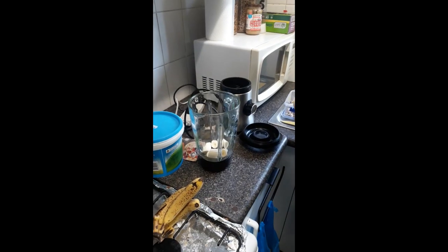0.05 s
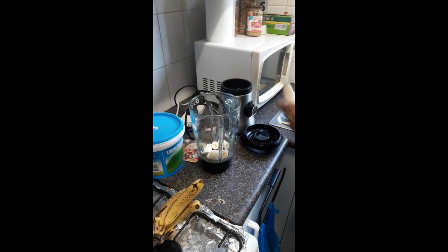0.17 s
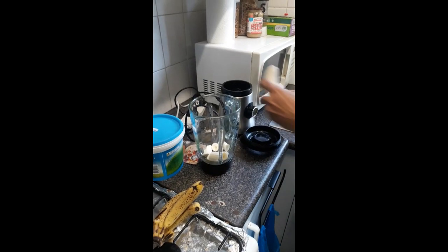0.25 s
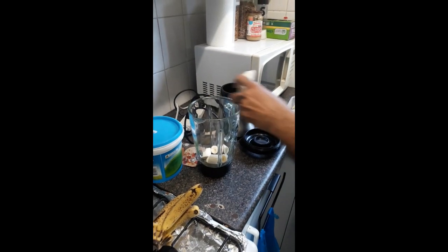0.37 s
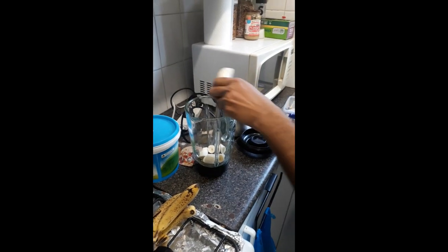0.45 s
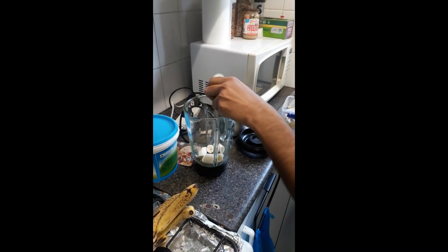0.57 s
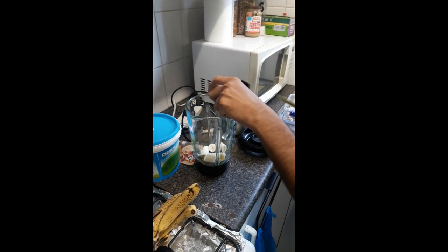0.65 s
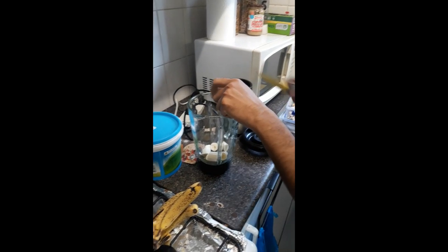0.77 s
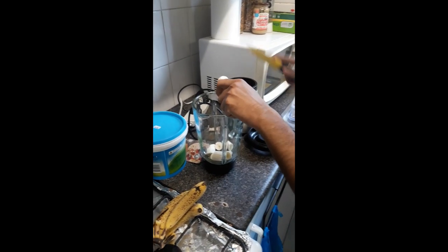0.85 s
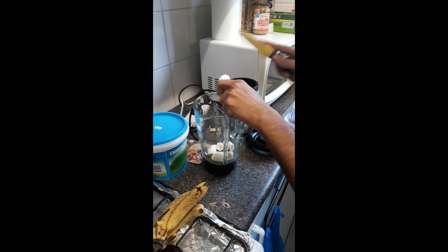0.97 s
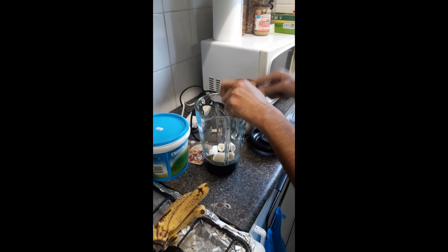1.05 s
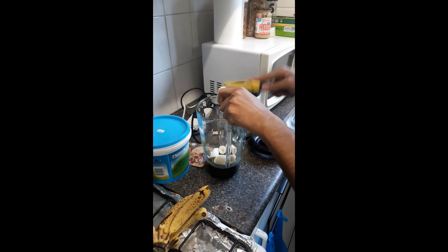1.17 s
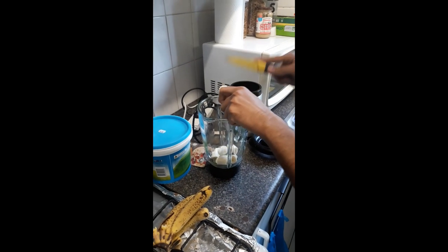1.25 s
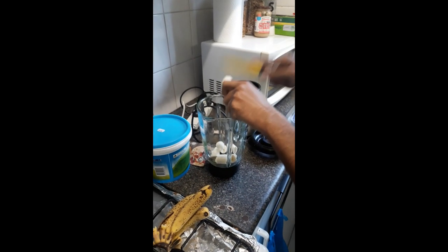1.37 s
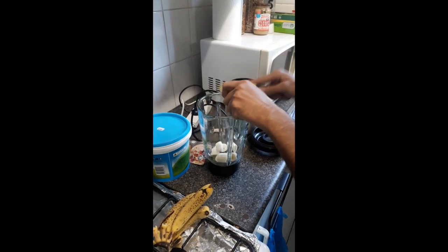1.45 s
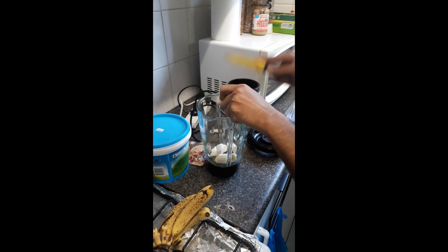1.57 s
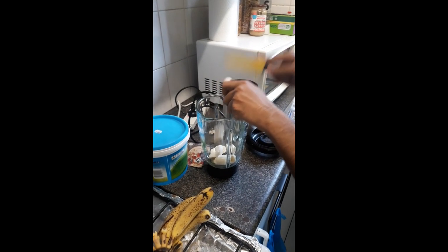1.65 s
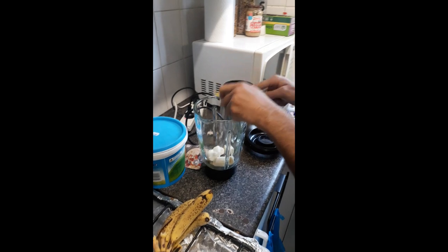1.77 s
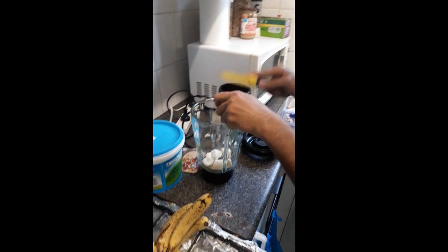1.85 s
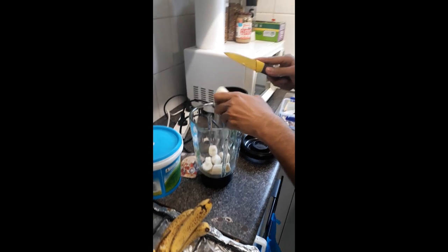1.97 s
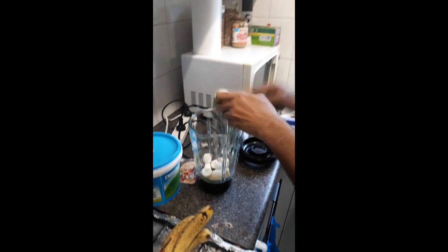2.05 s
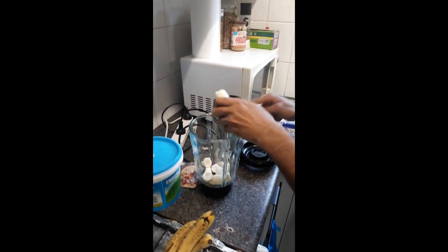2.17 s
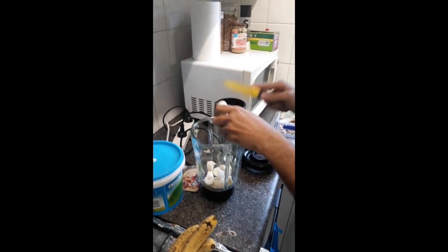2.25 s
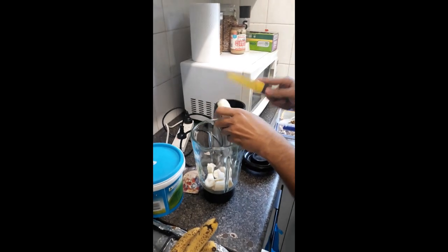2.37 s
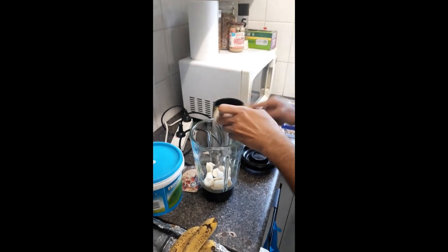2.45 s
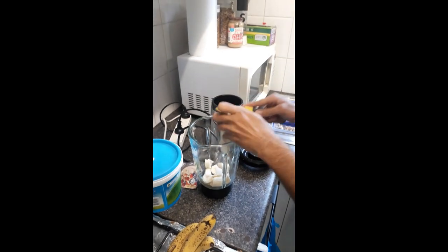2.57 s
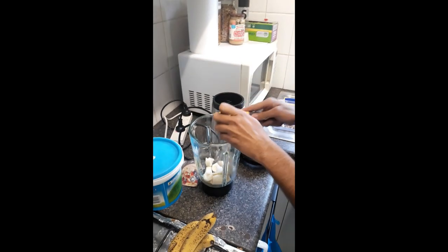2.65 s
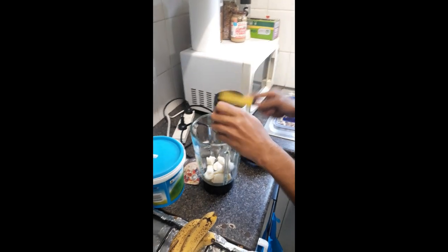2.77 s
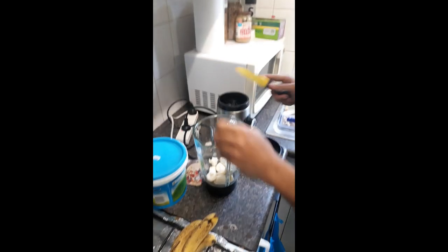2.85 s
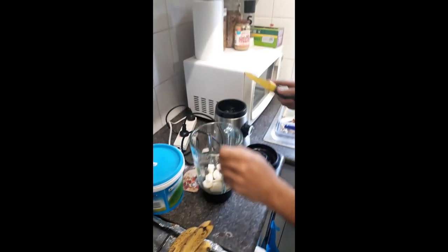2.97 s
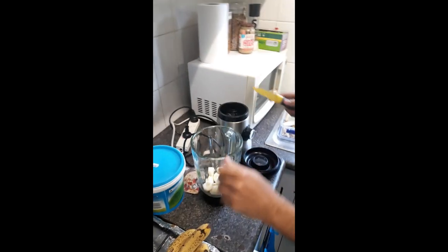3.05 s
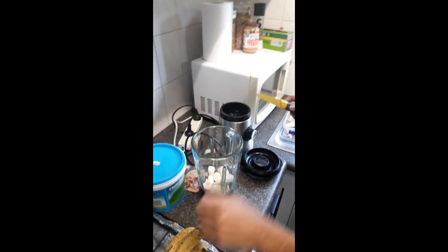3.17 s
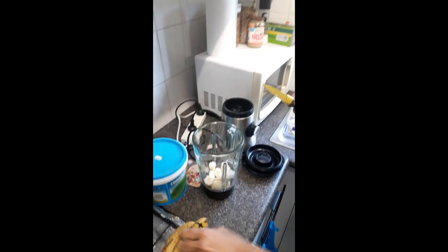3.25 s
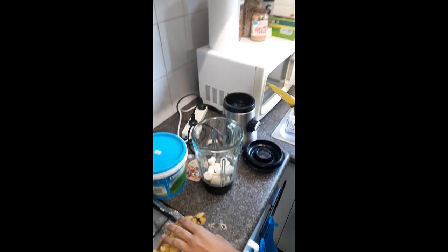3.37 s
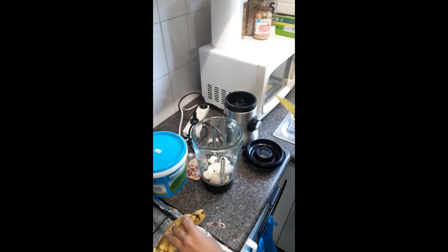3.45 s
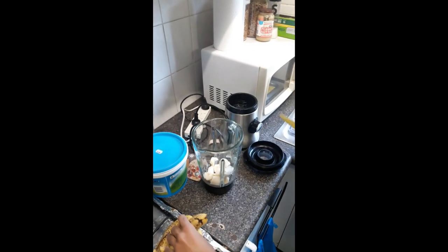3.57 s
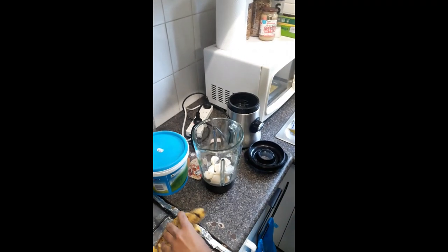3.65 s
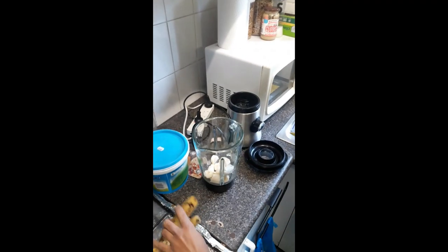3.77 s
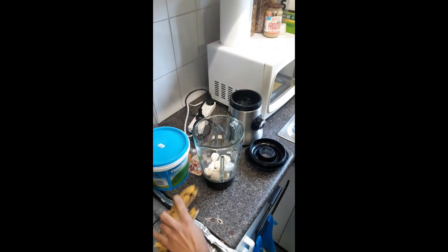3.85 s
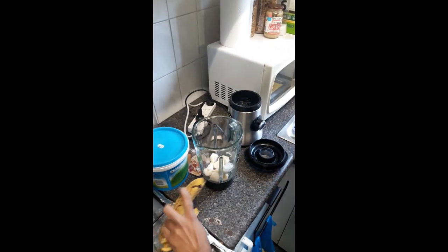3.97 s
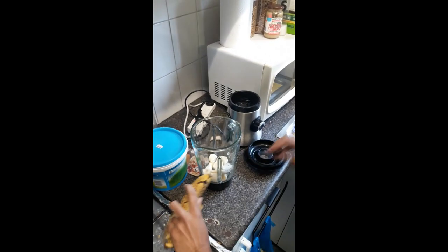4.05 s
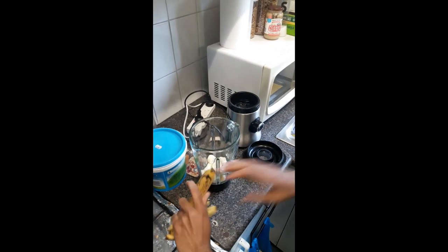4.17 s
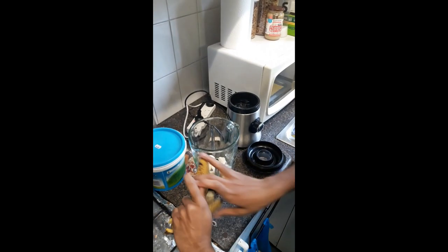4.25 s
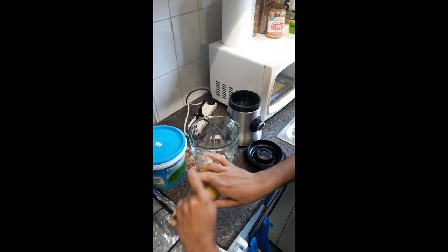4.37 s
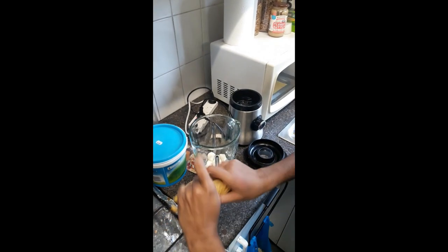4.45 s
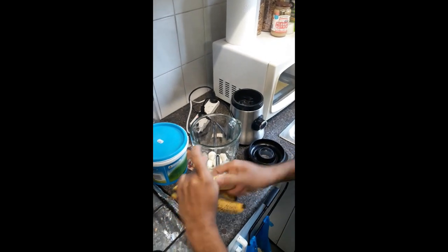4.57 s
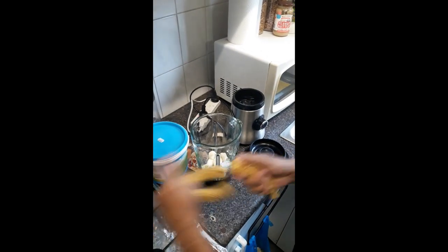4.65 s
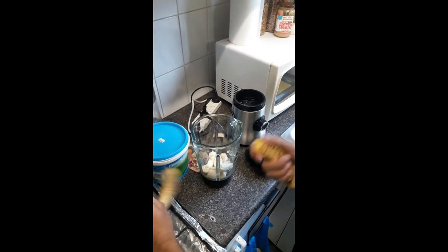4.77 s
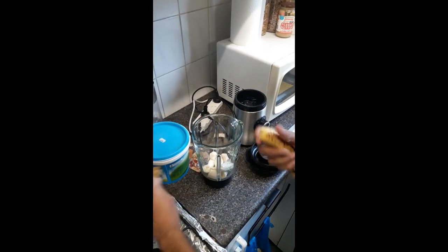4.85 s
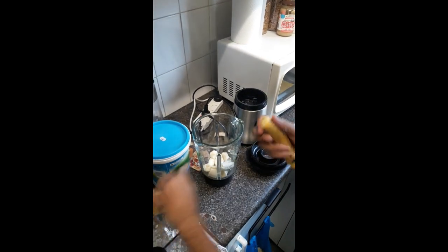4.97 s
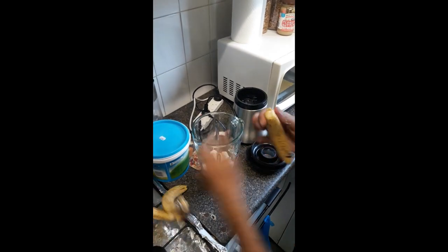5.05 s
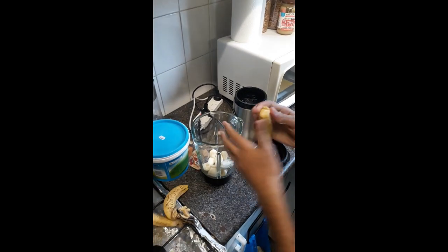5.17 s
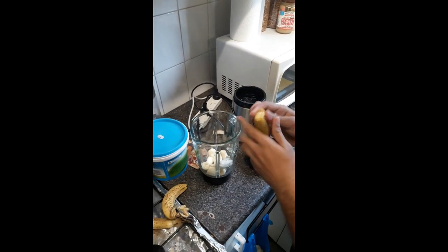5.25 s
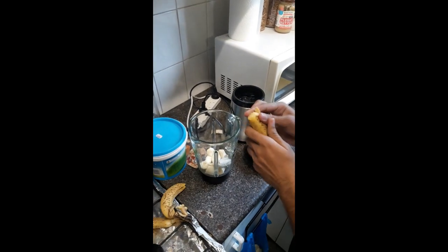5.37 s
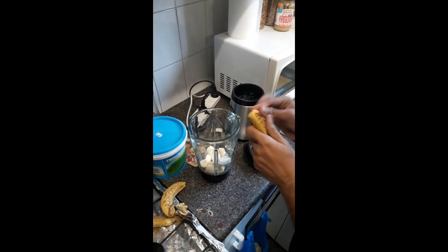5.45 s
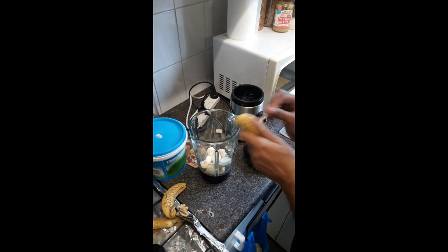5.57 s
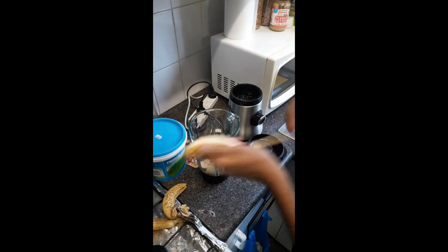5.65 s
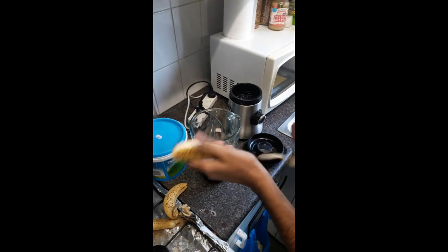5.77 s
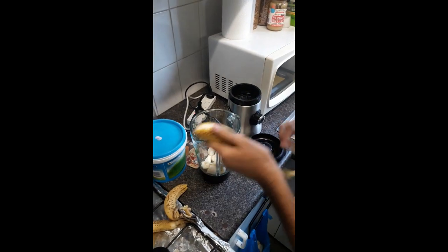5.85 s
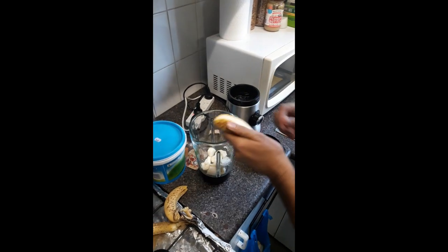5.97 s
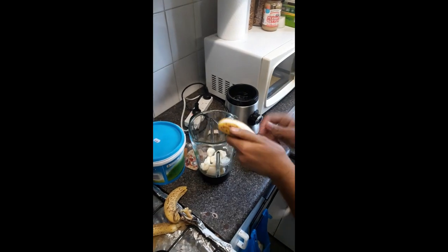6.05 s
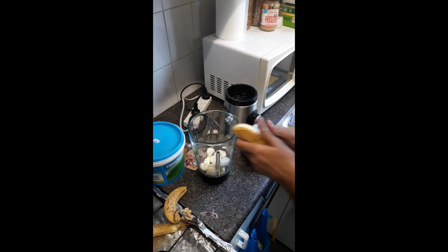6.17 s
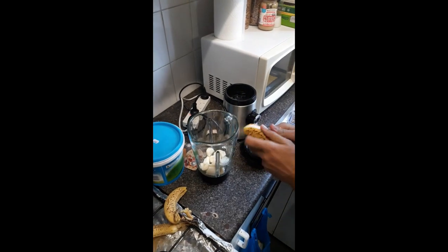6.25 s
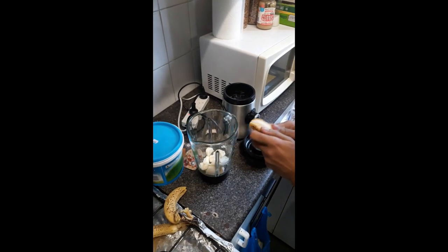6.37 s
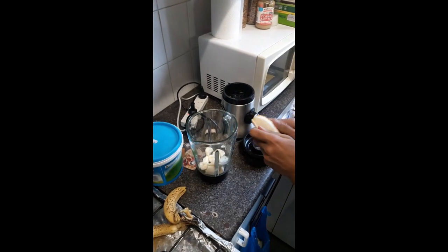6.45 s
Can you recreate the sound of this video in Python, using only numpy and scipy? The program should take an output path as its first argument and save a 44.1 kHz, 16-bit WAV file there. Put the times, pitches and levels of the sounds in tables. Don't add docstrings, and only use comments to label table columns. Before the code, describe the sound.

Quiet food preparation with faint thuds and rubbing, foil crackle, two sudden loud metallic clatters on a counter, then a small dry snap.

```python
import sys
import numpy as np
from scipy import signal
from scipy.fft import rfft, irfft
from scipy.io import wavfile
from scipy.ndimage import uniform_filter1d

SR = 44100
rng = np.random.default_rng(int(sys.argv[2]) if len(sys.argv) > 2 else 0)


def inscribe(sig):
    pcm = np.round(np.clip(np.atleast_2d(sig).T, -1, 1) * 32767)
    wavfile.write(sys.argv[1], SR, pcm.astype(np.int16))


def ratio_of_db(decibels):
    return 10 ** (np.asarray(decibels, float) / 20)


N = 286986
RING_T = np.arange(SR // 2) / SR
DIRECT_DB = 29.5


def unit(x):
    return x / np.sqrt(np.mean(x ** 2))


def band(x, lo_hz, hi_hz):
    return signal.sosfilt(signal.butter(2, [lo_hz, hi_hz], "band", fs=SR, output="sos"), x)


def colour(x, points):
    hz, db = np.transpose(points)
    bins_hz = np.arange(2049) * SR / 4096
    log_gain = np.interp(np.log(bins_hz + 1), np.log(hz), db) * np.log(10) / 20
    cepstrum = irfft(log_gain)
    cepstrum[1:2048] *= 2
    cepstrum[2049:] = 0
    return signal.fftconvolve(x, irfft(np.exp(rfft(cepstrum))))[:len(x)]


def wander(rows, length, hold, smooth):
    steps = np.repeat(rng.standard_normal((rows, length // hold + 1)), hold, axis=1)
    return uniform_filter1d(steps, size=smooth)[:, :length]


def add(out, start_s, x):
    i = int(max(start_s, 0) * SR)
    out[i:i + len(x)] += x[:len(out) - i]


def onset(rise_s):
    return 1 - np.exp(-RING_T / rise_s)


def ring(modes, scatter_db=3, detune=.01):
    hz, db, t60 = np.transpose(modes)[:, :, None]
    t60 = np.minimum(t60, .27)
    chance = rng.standard_normal((2, len(modes), 1))
    wave = np.sin(2 * np.pi * hz * (1 + detune * chance[0]) * RING_T)
    wave = wave * np.exp(-np.log(1000) * RING_T / t60)
    return np.sum(ratio_of_db(db + scatter_db * chance[1]) * wave, axis=0)


def spray(ms, onset_ms, crack=0.5):
    chance, t = rng.standard_normal((2, 3000)), np.arange(1, 3001) / SR
    decay = np.exp(-1000 * t / max(ms, .2)) + crack * np.exp(-t / 0.00091)
    x = chance[0] * ratio_of_db(8.07 * chance[1]) * decay
    x = x * (1 - np.exp(-1000 * t / max(onset_ms, .02)))
    return x / np.sqrt(np.sum(x ** 2))


# low_hz, high_hz
LANES_HZ = [(3400, 5300), (650, 2000), (220, 750), (9200, 16200), (2000, 3400), (5300, 9200)]
# freq_hz, level_db per Hz
PHONE = [(880, -37.5), (1500, -1.5), (1890, -15.5), (2150, -1), (2550, -1.5), (2740, 0), (3660, -0.5),
         (4950, -2.5), (6960, -6.5), (9310, -28), (15200, -16.5), (16000, -17), (16500, -45.5)]
# freq_hz, level_db per Hz
COUNTER = [(71, -46), (120, -14), (189, -14), (232, -12.5), (314, -10), (370, -2.5), (419, -7), (487, -7),
           (777, -11), (1010, -5.5), (2500, -8), (3070, -20.5), (3200, -8), (4160, -47.5), (7040, -120)]


def by_bands(lanes):
    probe = rng.standard_normal(SR)

    def narrow(x, lo, hi, tone):
        return colour(band(band(x, lo, hi), .7 * lo, 1.2 * hi), tone)

    treble = np.std(narrow(probe, 1900, 9200, PHONE))
    out = 0
    for k, (x, (lo, hi)) in enumerate(zip(lanes, LANES_HZ)):
        tone = COUNTER if k in (1, 2) else PHONE
        level = np.std(narrow(probe, lo, hi, tone)) if k in (1, 2, 3) else treble
        out = out + narrow(x, lo, hi, tone) / level
    return out


def voiced(start_s, db, weight, tone, ms, crisp=0, bright=-2.5):
    low_db, low_gain, air_db, onset_ms, presence_db = tone
    lanes_db = [db, db + weight, db + low_db + low_gain * weight, db + air_db + crisp,
                db + presence_db + 0.36 * min(weight, 6), db + bright]
    return start_s, lanes_db, ms, onset_ms


def blows(rows, tone):
    return [voiced(s, db, weight, tone, ms, 0.34 * db) for s, db, weight, ms in rows]


def sprays(hits, crack):
    lanes = np.zeros((6, N))
    for s, lanes_db, ms, onset_ms in hits:
        clicks = spray(ms, onset_ms, crack)
        push = 0.65 * clicks
        push[int(max(onset_ms, 0) * SR / 1000)] = 0.71 / (1 + 0.39 * onset_ms)
        for lane, db, x in zip(lanes, lanes_db, (clicks, clicks, push, clicks, clicks, clicks)):
            add(lane, s, x * ratio_of_db(db - 13.5))
    return by_bands(lanes)


# start_s, level_db, weight_db, length_ms
CUTLERY = [(3.8848, -5, -7, 3.8), (3.8908, -6, -8.5, 2.7), (3.8945, -4, -9, 3.3), (3.908, -16, -0.5, 7.2),
           (4.02, -26, 6.5, 11), (3.9188, -24, 13, 13), (3.942, -47, 28, 8.6), (3.956, -32.5, 13.5, 2.8),
           (3.9793, -33, 18.5, 17), (4.0119, -27.5, 9, 12.8), (4.0403, -25, -10, 3.9),
           (4.0606, -42.5, -13, 5.5)]
# start_s, level_db, weight_db, length_ms
LANDING = [(4.8199, -33, 3, 25), (4.8262, -27, 8, 12), (4.8387, -19, 2.5, 22), (4.8606, -33.5, 15.5, 10.4),
           (4.8791, -7.5, -4, 6.3), (4.8862, -5, -11.5, 4.6), (4.8921, -8, -5, 11), (4.8447, -24.5, 5, 12),
           (4.9, -13.5, -3, 4.4), (4.9077, -25.5, 9.5, 2.7), (4.938, -33, 12.5, 13),
           (4.9748, -23.5, -1.5, 6.9), (5.0304, -39, -14, 9.4), (5.0697, -43, -15, 10),
           (6.3105, -29.5, -4.5, 19), (6.3175, -39.5, 6, 12)]
# start_s, level_db, weight_db, length_ms
BUMPS = [(0.289, -52.5, 8, 28), (0.3894, -74.5, 20, 15.6), (0.4206, -72, 13.5, 12), (2.5899, -64, 5, 6.6),
         (3.538, -45, 2.5, 8.3), (3.561, -43.5, 7, 9.4), (3.8163, -40.5, -3, 13), (5.136, -41.5, 6, 10),
         (5.162, -46.5, -2, 11), (5.3911, -51, -2.5, 4.3), (5.4972, -49.5, 2.5, 12), (3.631, -45, -7.5, 10)]
# start_s, level_db, weight_db, crispness_db, brightness_db
KNIFE = [(0.0004, -39.5, -2, 2, -1), (0.096, -49.5, -13.5, 3, 1), (0.1167, -47.5, -8, -10, -4),
         (0.2141, -46.5, -3.5, -8, -3), (0.6784, -57, -22, -6, -3), (0.705, -60, -7, -3, 3),
         (1.0673, -53.5, 8, 4, -0.5), (1.073, -37.5, -14, 2, -3.5), (1.1, -45.5, -3, 8.5, -3.5),
         (1.18, -45, -13, 4, 3.5), (1.213, -47.5, -12, -3, -3), (0.224, -47, -10, -10, -16.5),
         (1.424, -47, -0.5, -2, 0.1), (1.438, -45.5, -6.5, 10, -0.17), (1.729, -47, -5, 7, -1),
         (1.7999, -49, -10, 3, -1.5), (2.0735, -45.5, -11, 9, 0.5), (2.2406, -50, -3.5, -4, -0.5),
         (2.4587, -56, 3, 11, 7), (2.6845, -45, -2.5, -5, 4), (2.715, -37, 1, -4.5, -4),
         (0.288, -51, -3, -8, -3), (0.309, -48, -6, -10, -12)]
# start_s, level_db, weight_db, crispness_db, brightness_db
FOIL = [(3.438, -40.5, -24, 4, 8.5), (3.4547, -38, -20.5, 8, 7), (3.5038, -33, -22, 20.5, 13),
        (3.648, -38, -0.5, -6, 0.5), (3.6778, -46, -5.5, -2, 5), (3.7405, -49.5, 0, 1, 7),
        (3.766, -35.5, -22, 9.5, 4.5), (3.8022, -35.5, -15, 16, 4), (4.3243, -45, -12.5, -8, 2.5),
        (4.4, -51.5, -15, 0, 3.5), (4.4228, -52.5, -10.5, 12.5, 6.5), (4.4562, -42, -3.5, 4.5, -1),
        (4.5156, -44, -17, 3, 2), (4.5457, -38.5, -15.5, 1, -1.5), (4.616, -54, -0.5, -8, 13.5),
        (4.634, -31.5, -11, 2, -3.5), (4.6486, -45, -18, 1, -7.5), (5.2485, -28.5, -25, 19, 12),
        (5.2798, -47, -1, 13, 1), (5.307, -49, -1, 14, 1), (5.4703, -51.5, -0.5, -3, -3),
        (5.762, -56, -18, 16, -1.8), (5.092, -46, -9, 11, 4), (3.557, -50, -18, 4, 1),
        (3.463, -47, -23.5, 5, 4), (3.511, -47, -14, 10, 0), (3.785, -43, -16, 5, 8.5),
        (3.807, -40.5, -22, 5, 11.5), (3.82, -36, -19, -2, -4), (5.361, -58, -20, 20, 2),
        (5.162, -37.5, -6, 21, 18.5), (5.2303, -35, -11, 5, 4), (5.2562, -23, -24, 14.5, 2),
        (5.388, -53.5, -18, 16, 9.5)]
# low_db, low gain per dB of weight, air_db, onset_ms, presence_db
CUTLERY_TONE, LANDING_TONE = (2.5, 1.1953, -15, 1.54, 1), (4.5, 1.21, -19, 1.5, 0.5)
BUMP_TONE = (6, 1.6527, -16.5, 4, -3.5)
KNIFE_TONE, FOIL_TONE = (-29, 1, -24, 0, -5), (-7, 1.2, -19.5, 0.04, 0.5)
KNIFE_MS, FOIL_MS = 19.4, 7.4


def contacts():
    heavy = blows(CUTLERY, CUTLERY_TONE) + blows(LANDING, LANDING_TONE)
    heavy += [voiced(s, db, w, BUMP_TONE, ms) for s, db, w, ms in BUMPS]
    ticks = [voiced(s, db, w, KNIFE_TONE, KNIFE_MS, crisp, bright) for s, db, w, crisp, bright in KNIFE]
    ticks += [voiced(s, db, w, FOIL_TONE, FOIL_MS, crisp, bright) for s, db, w, crisp, bright in FOIL]
    return sprays(heavy, crack=0.31), sprays(ticks, crack=0.47)


# freq_hz, level_db, t60_s
BOOM = [(110.08, 0, 0.17), (136.3, 0, 0.11), (88, -14.5, 0.26), (154.4, -10.5, 0.27), (189, -6.5, 0.11)]
# freq_hz, level_db, t60_s
KNOCK = [(225.4, -4, 0.2), (310, -2.5, 0.12), (340, -5, 0.099), (382, -5.5, 0.031), (479, -15, 0.25)]
# start_s, boom_db, knock_db above the boom
FRUIT = [(0.001, -60, 10), (0.067, -61, 1), (0.211, -41, -2), (0.232, -39, -5), (0.298, -36, 5.5),
         (0.311, -33.5, 3), (0.33, -34, 2), (0.387, -54, -3), (1.163, -61, 3), (1.267, -54.5, 3),
         (1.3, -44, -1), (1.377, -42.5, -8), (1.441, -59, -14), (1.752, -43.5, 4), (1.817, -51.5, -4),
         (1.993, -38.5, -6.5), (2.06, -48.5, 1.5), (2.118, -57.5, 7), (2.249, -55.5, -8), (2.63, -52, -17),
         (2.698, -40, 1), (2.747, -44, 2), (2.827, -56, 7)]
# start_s, boom_db, knock_db above the boom
KNOCKS = [(3.561, -60, 9), (3.627, -55, 10), (3.811, -58, 22), (3.887, -51, 3), (3.94, -53, 2),
          (4.011, -28.5, 12), (4.637, -55, 7), (4.827, -21, -3), (4.888, -51, 17), (4.915, -49, 10.5),
          (5.069, -44, 15.5), (5.148, -41.5, 13.5), (5.209, -38.5, -9.5), (5.297, -41.5, 1.5),
          (5.466, -48.5, 8), (5.599, -58, 0), (0.56, -69, 11), (3.43, -59.5, 12), (3.53, -48, 10),
          (3.7, -54, 4), (5.01, -42.5, 9), (4.821, -37, 22.5), (3.96, -36, 20)]


def thuds():
    out = np.zeros(N)
    for rows, push_ms in ((FRUIT, 2.26), (KNOCKS, 2.6)):
        build = onset(2 * push_ms / 1000) ** 2
        for s, boom_db, knock_db in rows:
            boom = ring(BOOM, scatter_db=1.5, detune=0.03)
            knock = ring(KNOCK, scatter_db=2.0, detune=0.018)
            add(out, s, ratio_of_db(boom_db) * (boom + ratio_of_db(knock_db - 7) * knock) * build)
    return out


# freq_hz, level_db, t60_s
TRAY = [(239.6, -5, .3), (294, -6, .3), (346.2, -3.5, .3), (396, -5.5, 0.13), (445, -10, 0.11),
        (510, -7.5, 0.71), (623, -8.5, 0.16), (704, -9.5, 0.38), (821.3, -7.5, 0.18), (932, -6.5, 0.19),
        (985, -7.5, 0.12), (1138, -10.5, 0.3), (1281, -10.5, 0.094), (1420, -11.5, .12)]
# freq_hz, level_db, t60_s
DISH = [(243.4, -9.5, .3), (301, -9.5, .25), (379, -8.5, 0.088), (485.2, -4, 0.25), (572, -9, 0.11),
        (667.6, -7.5, 0.13), (730, -5, .1), (825, -6, 0.078), (1013, -12, 0.11), (1117, -14.5, 0.17),
        (1359, -10.5, 0.13), (1615, -9.5, .3), (1873, -11, 0.15), (1975, -14, 0.092)]
# freq_hz, level_db, t60_s
JAR = [(355.73, 1.5, .3), (467.6, -4, 0.24), (1090, -5.5, 0.11)]
# start_s, level_db
JAR_TAPS = [
    (0.001, -61.5),
    (0.09, -62),
    (0.16, -64),
    (0.23, -59),
    (3.41, -61.5),
    (3.51, -56),
    (3.533, -56),
    (3.802, -48.5),
    (3.835, -51.5),
    (3.862, -53.5),
]


def struck_ware():
    out = np.zeros(N)
    falls = ((blows(CUTLERY, CUTLERY_TONE), TRAY, -21), (blows(LANDING, LANDING_TONE), DISH, -20.5))
    for hits, modes, ware_db in falls:
        for s, lanes_db, _, _ in hits:
            low_db = lanes_db[2]
            add(out, s, ratio_of_db(low_db + ware_db) * ring(modes, scatter_db=3.0, detune=0.004))
    for s, db in JAR_TAPS:
        add(out, s, ratio_of_db(db) * ring(JAR, scatter_db=0.5, detune=0.012) * onset(.004))
    return out


# freq_hz, level_db, t60_s
METAL = [(3332, -.5, 0.25), (3296, -11, .25), (483, -14, 0.3), (562, -11, .15), (1015, -20, 0.2),
         (1615, -14, 0.3), (1787, -15, .1), (6420, -6, 0.06), (4690, -13, 0.12), (5464, -18, .1),
         (1980, -15, .08), (2740, -16, .12)]
# start_s, level_db
STEEL = [
    (3.888, -38),
    (4.879, -23.5),
    (4.886, -9.5),
    (5.159, -76),
]
# freq_hz, level_db, t60_s
SNAP = [(328, -10, .09), (380, -4.5, 0.073), (465, -2.5, 0.045), (499, 0, 0.071), (628, -1.5, 0.03),
        (708, -3.5, 0.07), (890, -11.5, 0.05), (1108, -9.5, 0.095), (1381, -10.5, 0.067)]
# start_s, level_db
CRACKS = [
    (6.3105, -37.5),
    (6.3175, -40),
    (0.47, -60.5),
    (3.1, -56.5),
    (4.101, -56),
    (3.637, -56.5),
]
# freq_hz, level_db, t60_s
PING = [(4300, 6.5, 0.08), (6990, -8.5, 0.06), (1455, -5.5, 0.088)]
# start_s, level_db
PINGS = [
    (4.325, -70),
    (4.4, -65),
    (4.457, -65),
    (4.497, -62),
    (4.545, -60),
]


def steel():
    out, rise = np.zeros(N), onset(0.0014)
    damped = ratio_of_db(np.interp(RING_T, [.05, .062], [0, -7]))
    swell = onset(.005)
    for s, db in STEEL:
        add(out, s, ratio_of_db(db) * ring(METAL, scatter_db=1.0, detune=0.00036) * swell * damped)
    for s, db in CRACKS:
        add(out, s, ratio_of_db(db) * ring(SNAP, scatter_db=7, detune=0.02) * rise ** .6)
    for s, db in PINGS:
        add(out, s, ratio_of_db(db) * ring(PING, scatter_db=3.0, detune=0.013) * rise)
    return out


# freq_hz, level_db, t60_s
RIM = [(484, 0.5, .24), (1577, -12.5, .35), (246, -7, .3), (1110, -12, .25)]
# start_s, level_db
RIM_HITS = [
    (4.84, -27.5),
    (4.903, -22),
    (4.962, -27),
]
# freq_hz, level_db, t60_s
TINES = [(2220, -5.5, .04), (2771, -3.5, .04), (3063, -2.5, 0.045), (3310, -1, .05), (4334, -4.5, 0.05),
         (4840, -3, .04), (5180, -4, .04), (6400, -9.5, .04), (7444, -18, .15)]
# start_s, level_db
TINE_HITS = [
    (3.886, -20),
    (3.893, -17),
    (3.912, -25),
    (3.927, -26.5),
    (4.012, -38),
    (4.042, -35.5),
]
# freq_hz, level_db, t60_s
CLUNK = [(272, -6, .04), (360.8, -1, .04), (520, -2, 0.032), (994, -6, .035), (1310, -8, .03)]
# start_s, level_db
CLUNKS = [(3.941, -14.5), (3.953, -13), (3.974, -18.5), (3.985, -22.5), (4.009, -16), (4.032, -21),
          (4.073, -29), (4.828, -21), (4.847, -20), (4.944, -21), (3.9, -43), (3.582, -43), (3.592, -43),
          (3.637, -43), (6.3105, -33), (6.318, -35), (6.331, -38.5), (5.075, -44), (4.838, -21),
          (3.888, -21), (3.897, -19), (4.885, -17.5), (3.563, -52), (4.02, -21)]


def clatter():
    out, rise = np.zeros(N), onset(0.00098)
    for hits, modes, detune in ((RIM_HITS, RIM, .001), (TINE_HITS, TINES, .006), (CLUNKS, CLUNK, .05)):
        for s, db in hits:
            add(out, s, ratio_of_db(db) * ring(modes, scatter_db=3.0, detune=detune) * rise)
    return out


# start_s, length_s, level_db, weight_db, crispness_db
STROKES = [(0.001, 0.084, -61.5, 7.5, -7), (.12, 0.145, -70, 6, -8.5), (.2, 0.25, -66.5, 6, -16.5),
           (2.426, 0.34, -64, 0.5, -0.5), (2.6, 0.25, -64, 1, -5), (2.756, 0.22, -59.5, -8, -1.5),
           (3.035, 0.28, -44.5, -1.5, -0.5), (3.19, 0.24, -47, -0.5, -1), (3.403, 0.17, -52.5, 0, -19),
           (3.49, 0.203, -56.5, 4, -10), (3.62, 0.35, -56, 3, -0.5), (3.788, 0.055, -44.5, -6, 7),
           (3.301, 0.25, -59.5, 1, 2), (4.297, 0.14, -62.5, 2.5, -3), (4.433, 0.14, -59.5, 0, -3),
           (4.517, 0.072, -54, -5.5, 2.5), (4.62, 0.097, -64.5, 0, 4), (5.141, 0.11, -38, -8, 9),
           (5.227, 0.12, -31, -10, 6), (5.288, 0.14, -58.5, 4, 8), (5.448, 0.16, -59.5, 5.5, -4),
           (5.562, 0.267, -58, -0.5, 0), (5.698, 0.164, -66.5, -3, -9)]
# freq_hz, level_db
FILM = [(300, -0.9), (1500, -3.5), (2200, 2), (2750, -5.5), (3300, -1.5), (3900, 2.5), (5500, -1),
        (8000, 2.5), (15000, -1.62)]


def rubbing(grain_db=5, flicker_db=1.5):
    lanes = np.zeros((6, N))
    flicker = wander(6, N, 300, 300)
    grains = unit(rng.standard_normal(N) * ratio_of_db(grain_db * rng.standard_normal(N)))
    grains = grains * ratio_of_db(flicker_db * flicker)
    for s, length_s, db, weight, crisp in STROKES:
        progress = np.linspace(0, 1, int(length_s * SR))
        swell = np.abs(np.sin(np.pi * progress ** 0.73)) ** 2.23
        tone_db = [0, -7 + weight, -13.5 + 1.7 * weight, -15.5 + crisp, -1.5 + 0.49 * weight, 0.49 * crisp]
        for lane, lane_db in zip(lanes, tone_db):
            add(lane, s, ratio_of_db(db + lane_db) * swell)
    return colour(by_bands(lanes * grains), FILM)


# time_s, level_db
SLIDE = [
    (3.025, -77),
    (3.055, -57.5),
    (3.12, -49.5),
    (3.19, -64),
    (3.225, -62),
    (3.26, -51.5),
    (3.32, -60),
    (3.37, -69.5),
    (3.42, -77.5),
]
# freq_hz, width_hz, level_db
FOLDS = [(3750, 500, -1.5), (4470, 300, -3.5), (5060, 890, -4), (2400, 900, -7.5)]


def slide(grain_db=7):
    s, db = np.transpose(SLIDE)
    grains = rng.standard_normal(N) * ratio_of_db(grain_db * rng.standard_normal(N))
    folds = 0
    for hz, width_hz, fold_db in FOLDS:
        folds = folds + ratio_of_db(fold_db) * unit(band(grains, hz - width_hz / 2, hz + width_hz / 2))
    return folds * ratio_of_db(np.interp(np.arange(N) / SR, s, db, left=-120, right=-120))


# freq_hz, t60_s
ROOM_T60 = [(150, 0.49), (400, 0.37), (1200, 0.36), (3000, 0.32), (6000, 0.32), (9000, 0.25), (14000, 0.25)]


def kitchen(lumpy_db=3):
    t, echo = np.arange(SR) / SR, 0
    hz_at, t60_at = np.transpose(ROOM_T60)
    for hz in 125 * 2. ** np.arange(0, 7.1, .5):
        t60 = np.interp(np.log(hz), np.log(hz_at), t60_at)
        lumps = wander(1, SR, 300, 200)[0]
        noise = band(band(rng.standard_normal(SR), hz / 1.22, hz * 1.22), hz / 1.22, hz * 1.22)
        echo = echo + noise * ratio_of_db(lumpy_db * lumps) * np.exp(-np.log(1000) * t / t60)
    echo = echo * (1 - np.exp(-t / 0.0017))
    echo[0] = ratio_of_db(DIRECT_DB)
    return echo


# start_s, length_s, pitch_hz, level_db
CHIRPS = [
    (0.925, .05, 5300, -78),
    (.93, .05, 6050, -85),
    (.92, .045, 4830, -77),
    (1.967, .05, 5360, -80),
]


def bird():
    out = np.zeros(N)
    for s, length_s, hz, db in CHIRPS:
        t = np.arange(int(length_s * SR)) / SR
        whistle = np.sin(2 * np.pi * hz * t * (1 - 0.057 * t))
        add(out, s, ratio_of_db(db) * np.sin(np.pi * t / length_s) * whistle)
    return out


# time_s, tyre_band_hz, level_db
PASSING = [
    (0, 1053, -81),
    (4.5, 1050, -81),
    (5.4, 950, -83.5),
    (5.8, 980, -81),
    (6.05, 1098, -76.5),
    (6.3, 1236, -75.5),
    (6.51, 1280, -75.5),
]


def passing():
    s, hz, db = np.transpose(PASSING)
    t = np.arange(N) / SR
    low_pass = signal.butter(2, 260 / 2, fs=SR, output="sos")
    a, b = signal.sosfilt(low_pass, rng.standard_normal((2, N)))
    phase = 2 * np.pi * np.cumsum(np.interp(t, s, hz)) / SR
    return unit(a * np.cos(phase) + b * np.sin(phase)) * ratio_of_db(np.interp(t, s, db))


# freq_hz, level_db per Hz
HUM = [(15, -40.5), (25, -14), (87, 0), (108, -3.5), (310, -12.5), (355, -10), (719, -17), (943, -11),
       (1270, -14), (1760, -22), (2370, -25), (4540, -25.5), (5400, -27), (7190, -31), (9600, -36.5),
       (15800, -32)]
# time_s, level_db
HUM_LEVEL = [
    (0, -66),
    (.6, -68.5),
    (1.9, -69.5),
    (2.3, -68),
    (3.3, -66),
    (4.3, -70),
    (5.4, -72),
    (5.85, -80),
    (6.2, -79),
    (6.51, -77),
]


def hum():
    s, db = np.transpose(HUM_LEVEL)
    noise = colour(rng.standard_normal(N), HUM)
    drone = band(noise, 710, 1300)
    flicker = wander(1, N, 3000, 3000)[0]
    swell = ratio_of_db(np.interp(np.arange(N) / SR, s, db) + 1.5 * flicker)
    rest = (noise - drone) * swell ** 0.4 * ratio_of_db(-46.5)
    return (drone * swell + rest) / np.std(drone)


def scene():
    echo = kitchen()
    echo_level = np.sqrt(np.sum(echo ** 2))
    rub, body, ware = rubbing(), struck_ware() + thuds(), band(steel(), 240, 12000)
    spread = (ratio_of_db(-8) * rub + ratio_of_db(-1.5) * body + ratio_of_db(-7.5) * ware) / echo_level
    heavy, ticks = contacts()
    sent = ratio_of_db(-1) * ticks + spread
    turn = 2 * np.pi * 7 * np.arange(N) / SR
    late = np.arange(N) > 4.75 * SR
    room = signal.fftconvolve(sent * ~late + heavy * np.abs(np.cos(turn)), echo)
    room = room + signal.fftconvolve(sent * late + heavy * np.abs(np.sin(turn)), kitchen())
    near = room[:N] + ratio_of_db(DIRECT_DB - 11) * ticks + ratio_of_db(-2.0) * rub + body + ware
    floor, close = hum() + passing(), clatter() + slide()
    near = near + close + ratio_of_db(-4) * signal.fftconvolve(close, echo)[:N] / echo_level
    near = signal.sosfilt(signal.butter(6, 85, "high", fs=SR, output="sos"), near)
    return (near + floor + bird())[None]


def roll_off(x):
    return signal.sosfilt(signal.butter(12, 17000, fs=SR, output="sos"), x)


def record(dry):
    rounded = np.tanh(1.038 * dry) / 1.146
    mix = signal.sosfilt(signal.ellip(8, .2, 70, 15800, fs=SR, output="sos"), rounded)
    return roll_off(mix)


dry = scene()
out = record(dry)
inscribe(out)
```